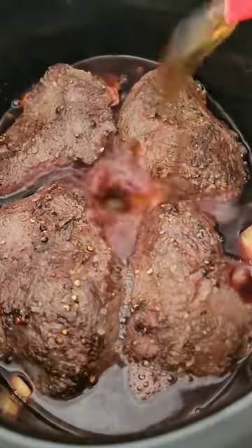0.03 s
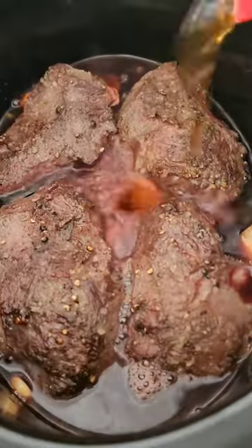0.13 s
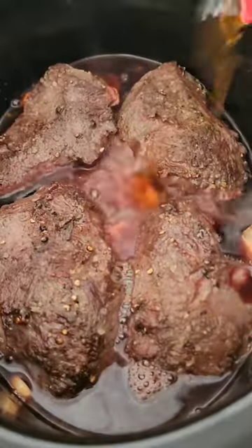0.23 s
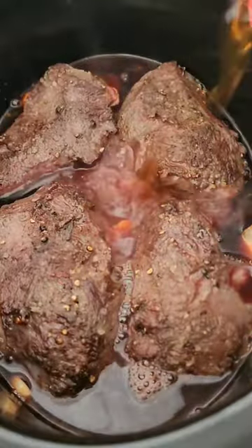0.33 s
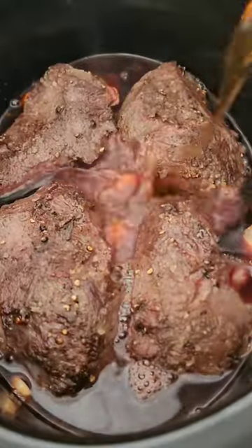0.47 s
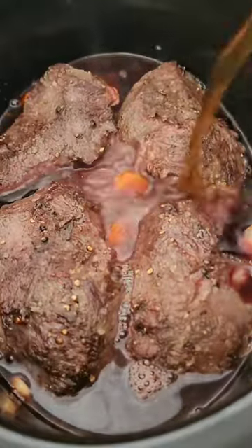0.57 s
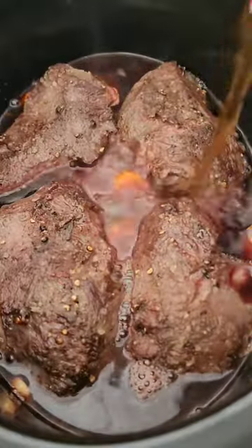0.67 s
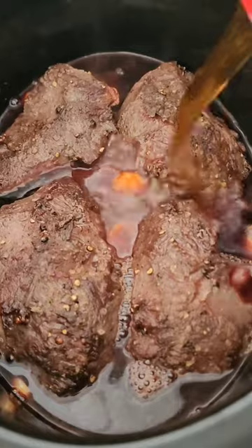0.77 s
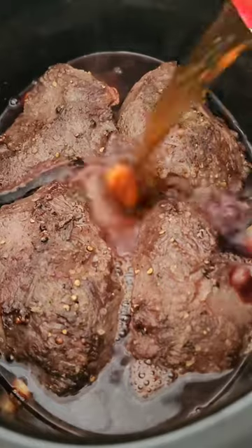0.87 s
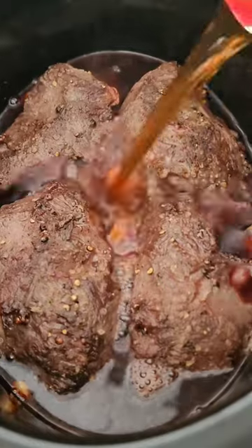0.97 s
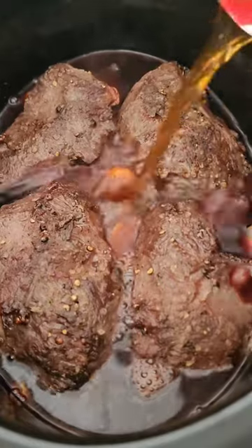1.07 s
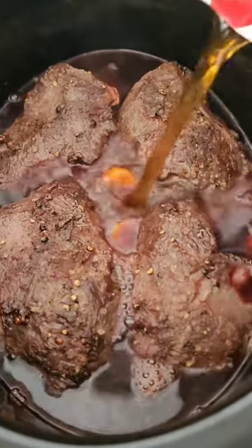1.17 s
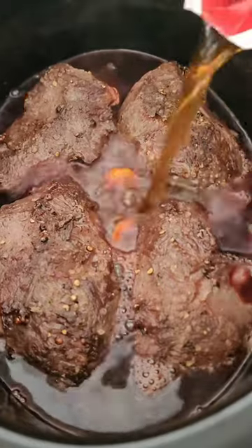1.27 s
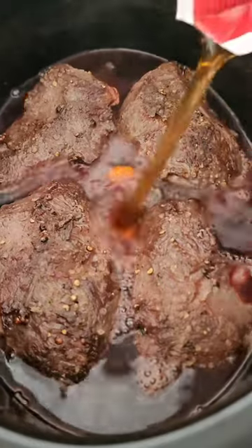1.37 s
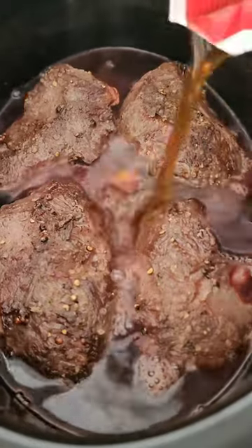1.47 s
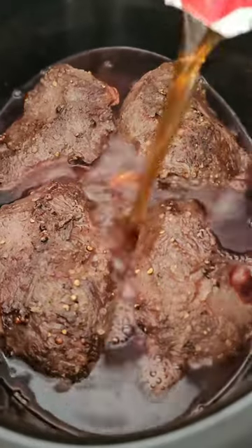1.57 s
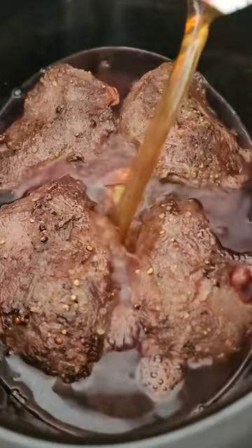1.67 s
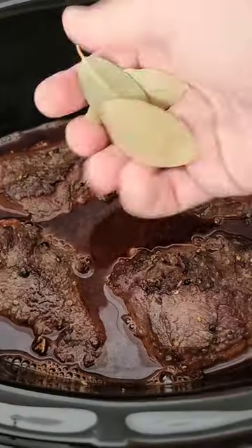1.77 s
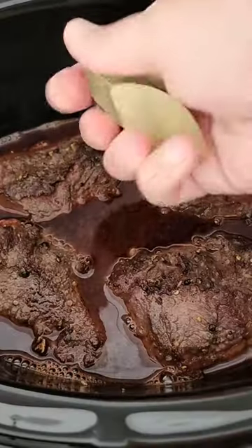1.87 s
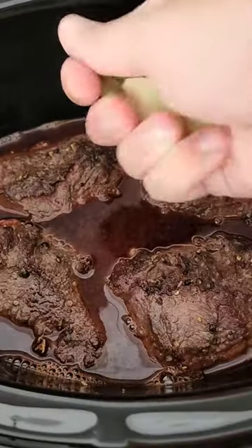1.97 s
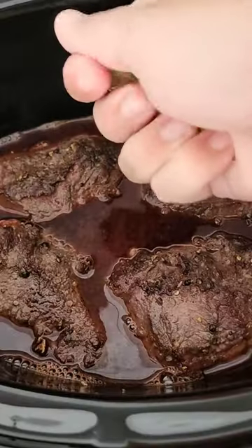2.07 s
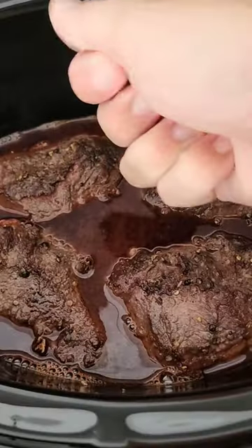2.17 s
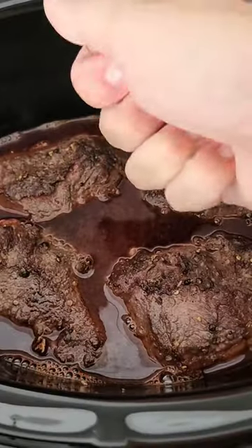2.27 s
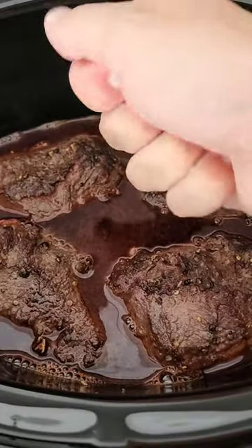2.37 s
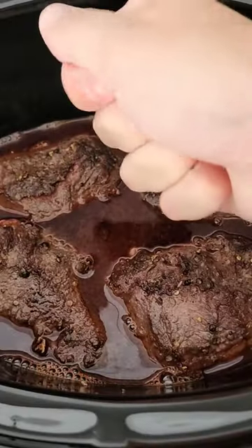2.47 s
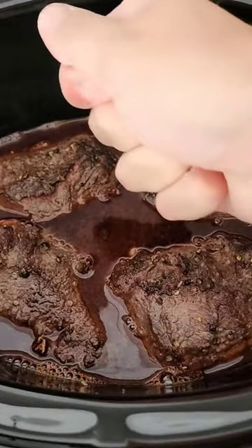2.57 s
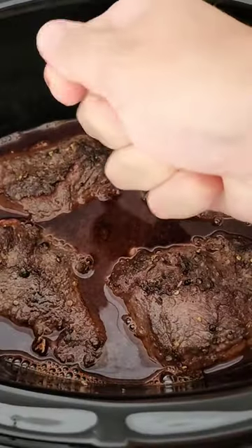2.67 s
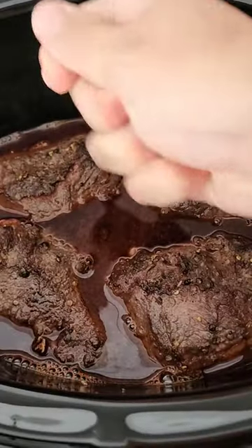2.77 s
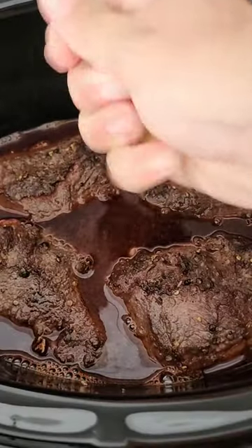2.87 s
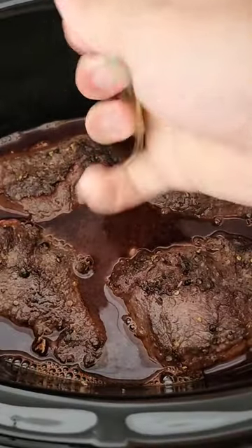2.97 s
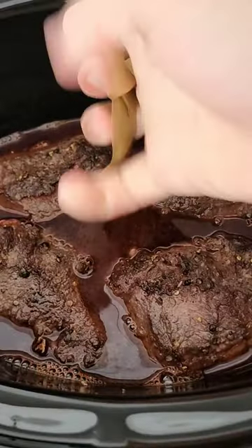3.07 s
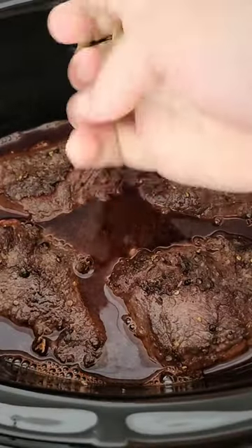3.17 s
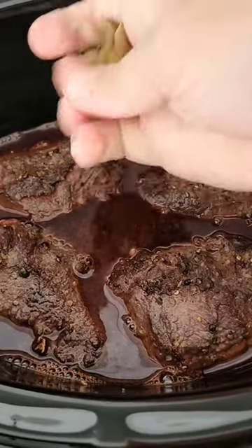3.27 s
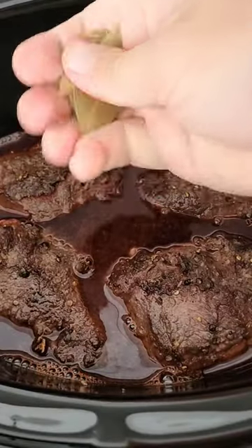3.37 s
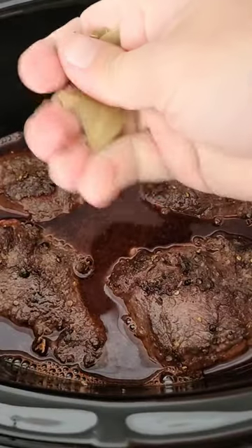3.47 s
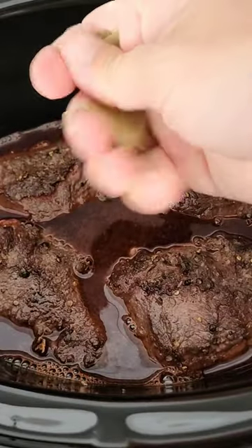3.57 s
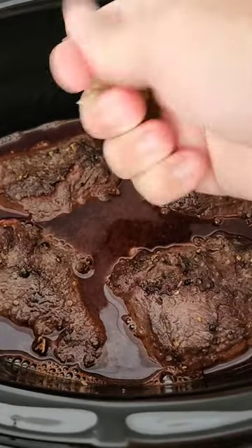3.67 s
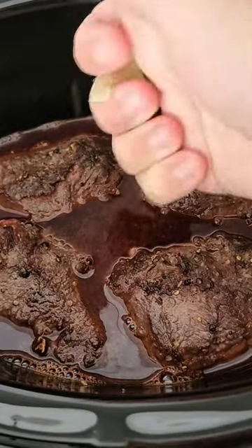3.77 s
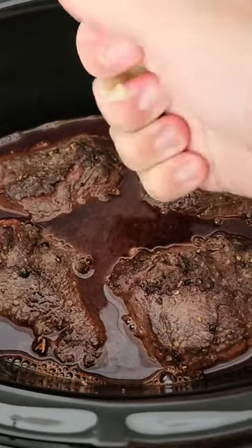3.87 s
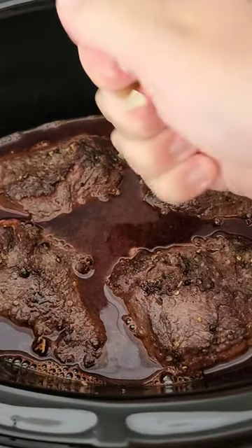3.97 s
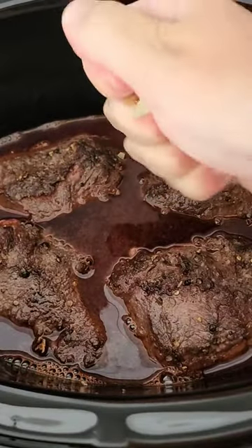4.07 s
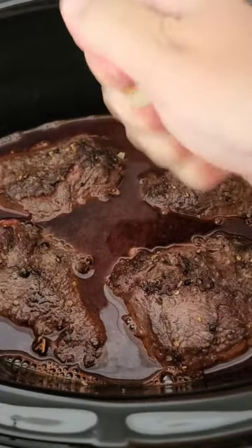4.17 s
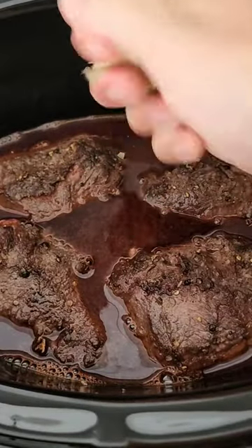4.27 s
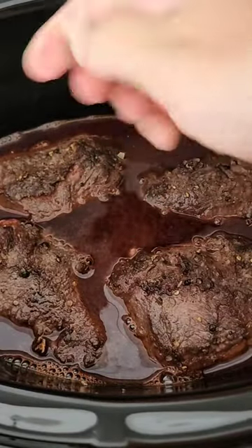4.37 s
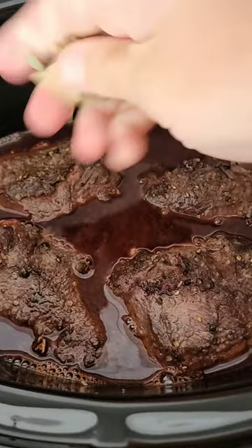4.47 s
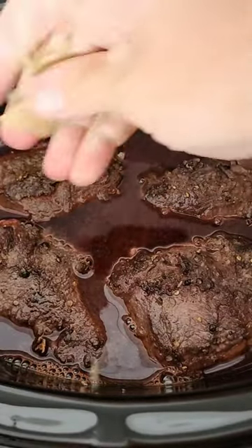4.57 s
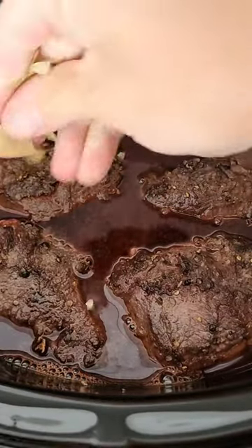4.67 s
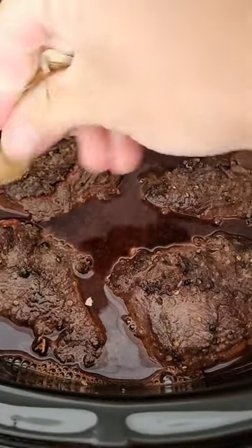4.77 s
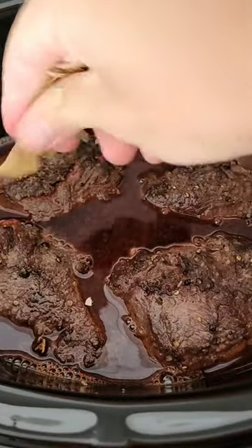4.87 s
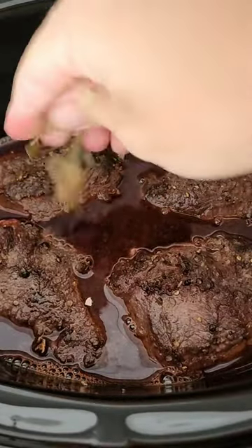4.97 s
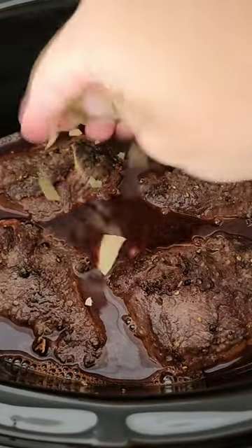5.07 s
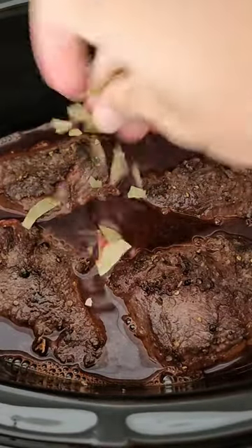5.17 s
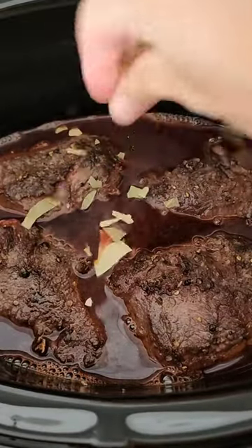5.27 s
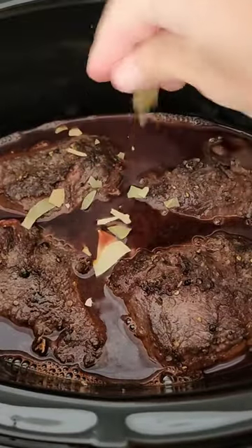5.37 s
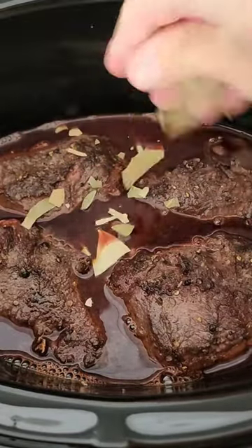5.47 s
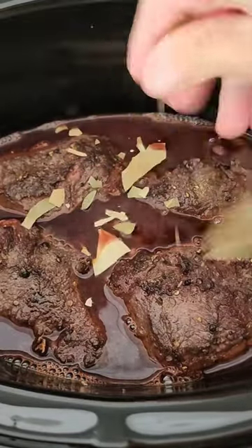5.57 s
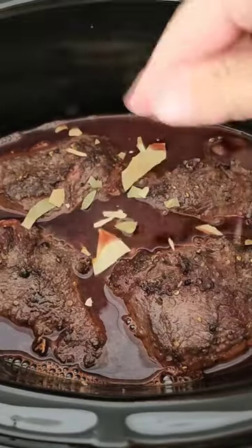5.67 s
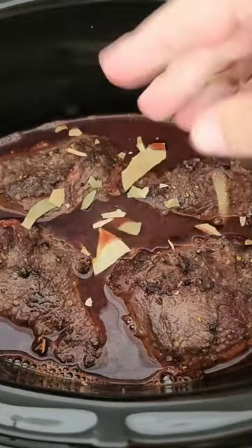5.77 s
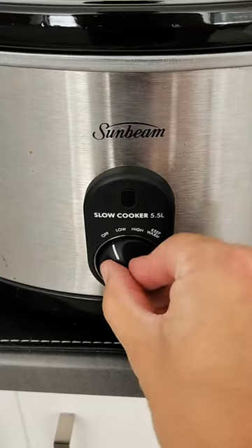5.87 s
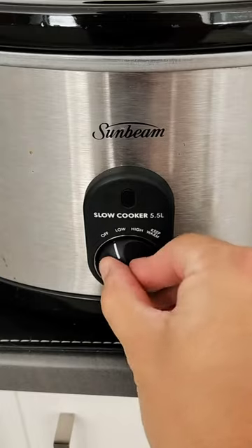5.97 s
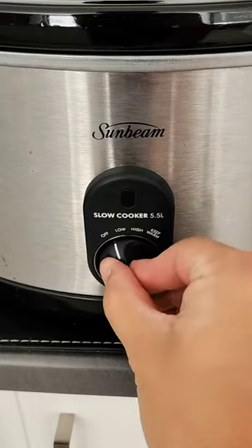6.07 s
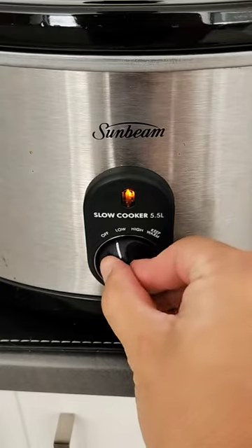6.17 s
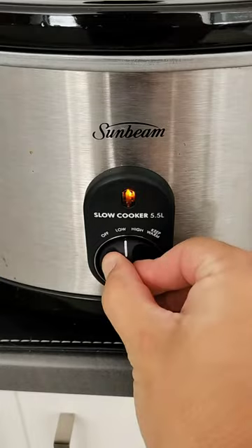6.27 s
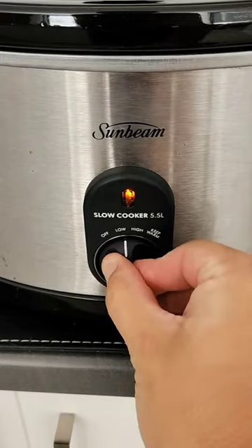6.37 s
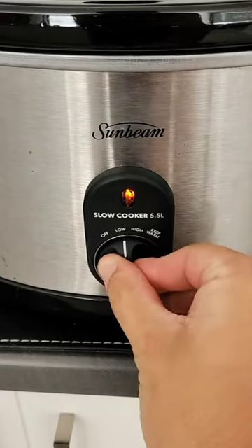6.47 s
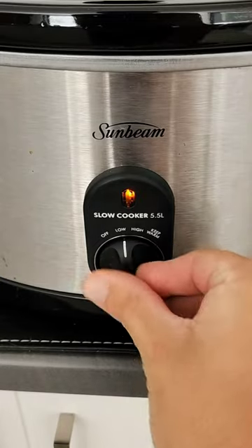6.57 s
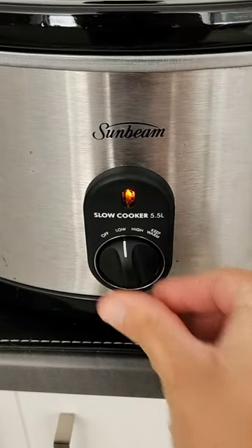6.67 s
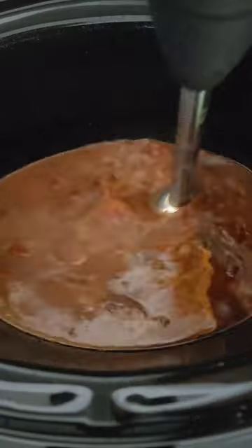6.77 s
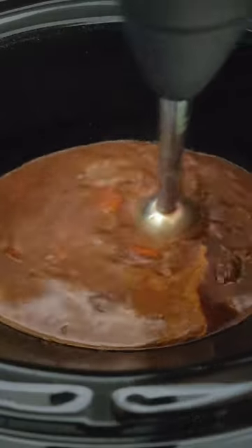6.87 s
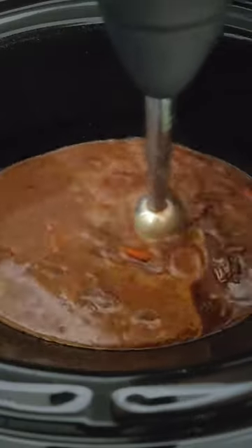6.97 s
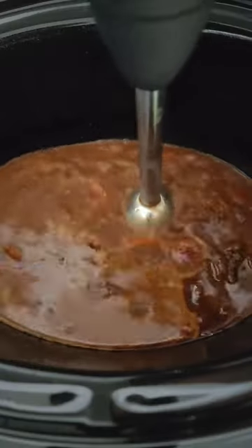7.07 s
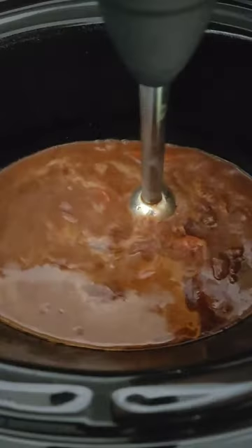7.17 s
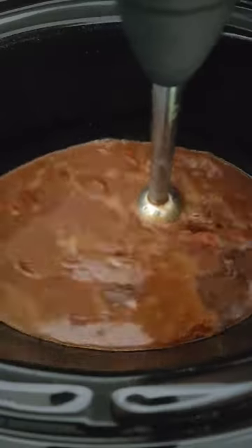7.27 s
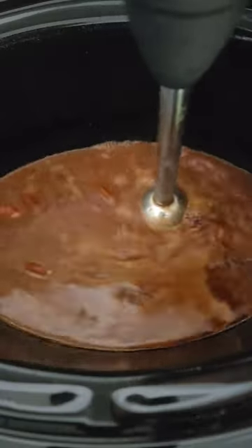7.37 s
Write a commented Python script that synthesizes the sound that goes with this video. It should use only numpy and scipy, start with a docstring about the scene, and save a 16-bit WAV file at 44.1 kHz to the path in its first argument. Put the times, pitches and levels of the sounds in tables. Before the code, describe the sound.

Liquid gulps and patters over meat in a deep pot, with bright chirping bubbles and a slight hollow ring. Brittle leaves then crack violently right by the microphone, clipping and thumping, pause, crunch again and dwindle to rustles. After near silence a dial gives a small double click, and an electric hand blender cuts in, droning and hissing through wet sauce until the end. Close phone pickup, small indoor room.

```python
"""Small kitchen, close to a phone: cooking in a slow cooker.
Stock glugs from a carton onto meat (noise splats, chirped bubbles), dry leaves are crushed over the pot
(noise cracks, grains in fluctuating bands), the dial rubs and clicks (grains, noise hits),
and a stick blender churns sauce (shaft harmonics, grains, comb-filtered hiss).
The crock colours stock and leaves; the room adds a tail to those and the dial. Faint rumble and hum."""
import sys
import numpy as np
from scipy import signal
from scipy.fft import rfft, irfft, next_fast_len
from scipy.io import wavfile
from scipy.ndimage import uniform_filter1d

SR = 44100
rng = np.random.default_rng(int(sys.argv[2]) if len(sys.argv) > 2 else 0)


def transcribe(u):
    """Save the signal u as a 16-bit wav file named by the first command-line argument.

    u: samples, shape (n,) or (channels, n), limited to [-1, 1]; the rate is SR.
    q: integer samples, one column per channel.
    """
    v = np.clip(np.atleast_2d(u).T, -1, 1)
    q = np.round(v * 32767).astype(np.int16)
    wavfile.write(sys.argv[1], SR, q)


N = 326781

# leaf snaps: t/s, level/dB, tilt/(dB/octave)
LEAF_SNAPS = [(2.0855, -20.5, -9.5), (2.1067, -14, -10.5), (2.1264, -11.5, -10.5), (2.1512, -9.5, -5),
              (2.1656, -5, 2.5), (2.2083, -8, 3.5), (2.2514, -5, 2), (2.27, -6.5, -0.5), (2.2775, -5.5, 2),
              (2.3843, -9.5, 1.5), (2.392, -13.5, -3), (2.4124, -12, 1.5), (2.4575, -9, 5),
              (2.4876, -12.5, -0.8), (2.51, -11, -1.5), (2.553, -14.5, -3.5), (2.5657, -11.5, 5),
              (2.5701, -8, 0.5), (2.5835, -15, 1), (2.6799, -15, 7.5), (2.71, -14.5, 16),
              (2.7377, -19.5, 4), (2.7575, -15.5, 2), (2.7701, -12, 3), (2.9375, -31.5, 3), (3.025, -20, 5),
              (3.0957, -26, 4), (3.2723, -37, 9), (3.402, -32.5, 7), (3.4865, -8.5, 5.5), (3.5009, -16, 3),
              (3.6374, -17, 0.4), (3.7889, -16.5, -1.7), (3.8367, -5, -1), (3.9149, -5.5, 1),
              (3.9227, -8.5, -1), (3.9662, -9.5, -1), (3.9754, -10.5, 2.5), (4.0021, -9.5, -0.7),
              (4.009, -11, 0.5), (4.0781, -11.5, -1), (4.099, -26, -4), (4.1735, -21, 0), (4.1859, -10, -1),
              (4.2324, -17, 1.2), (4.5763, -22, 6.5), (4.633, -20.5, -2.5), (4.6734, -29, 2),
              (4.7727, -28.5, 2), (4.9288, -28.5, 2.5), (5.0415, -14, 8), (5.0855, -21, -2),
              (5.1772, -34.5, -6.5), (5.2182, -33, 10), (5.2885, -39, 0), (5.7815, -44.5, 6)]
# low microphone thumps at some snaps: t/s, level/dB
SNAP_THUMPS = [(2.164, -35), (2.252, -36), (2.268, -35), (2.413, -14.5), (2.457, -14.5), (2.518, -14),
               (2.575, -31), (2.710, -21), (3.488, -22.5), (3.837, -36), (4.002, -23.5), (4.185, -16.5)]
# squeezes of the fist: start/s, length/s, crunch level/dB, fine crackle level/dB
FIST_SQUEEZES = [(1.961, 0.025, -50.5, -54), (2.044, 0.025, -38.5, -50), (2.11, 0.069, -20.5, -34),
                 (2.24, 0.081, -25.5, -30), (2.38, 0.051, -27.5, -19.5), (2.513, 0.094, -34, -21),
                 (2.758, 0.034, -31.5, -31), (2.852, 0.19, -45.5, -42), (3.019, 0.07, -42.5, -30.5),
                 (3.232, 0.21, -63, -43.5), (3.422, 0.025, -41, -41), (3.478, 0.048, -27, -21),
                 (3.56, 0.23, -42.5, -37.5), (3.745, 0.037, -30.5, -41), (3.91, 0.14, -27, -25.5),
                 (4.094, 0.13, -32, -38), (4.371, 0.24, -39, -34), (4.608, 0.046, -37, -28.5),
                 (4.683, 0.12, -46.5, -35.5), (4.832, 0.084, -49, -38.5), (5.012, 0.062, -37.5, -31.5),
                 (5.14, 0.081, -58, -39), (5.263, 0.089, -57.5, -39), (5.431, 0.095, -86, -49),
                 (5.579, 0.0093, -70, -43), (5.74, .05, -73.5, -56.5)]
# rasps in the hollow of the hand, and rings of flakes landing in the pot: t/s, centre f/Hz, level/dB, decay/s
RASPS_AND_LANDINGS = [(2.384, 2930, -15, 0.018), (2.552, 1830, -14.5, 0.012), (2.583, 1880, -18, .012),
                      (2.641, 1900, -27, .008), (2.657, 1920, -27, .008), (2.68, 1860, -24, 0.0075),
                      (2.565, 913, -33, 0.038), (3.918, 960, -22, 0.014), (4.449, 1270, -48, 0.038),
                      (4.632, 960, -34, 0.01), (4.921, 1160, -45.5, 0.02), (5.038, 1050, -47.5, 0.045),
                      (5.596, 3720, -57, 0.013), (5.781, 4400, -47, 0.013)]
# leaf spectrum: f/Hz, relative level/dB
LEAF_SPECTRUM = [(180, -50.5), (300, -37.5), (744, -28), (877, -16.5), (1620, -17.5), (1840, -6.5),
                 (2100, -7.5), (3180, 3.5), (3690, -1.5), (4720, 2), (8280, -2), (13100, -3), (15500, -3.5)]
# splats on meat and liquid: t/s, reference level/dB, tilt/(dB/octave)
STOCK_SPLATS = [(0.021, -25.5, 0.5), (0.0694, -24, -1.5), (0.0817, -24, 2), (.039, -27, 3),
                (0.129, -28, 0.5), (0.197, -22.5, -0.5), (0.2942, -22.5, 2), (0.3598, -23.5, 4),
                (0.446, -21, 1.5), (0.4828, -19, 5.5), (0.5424, -20.5, 3.5), (0.5625, -25, 3),
                (0.5945, -24.5, -1), (0.657, -22.5, -2.5), (0.6846, -30, -2), (0.726, -27.5, 2),
                (0.766, -30.5, -1), (0.822, -31.5, -3.5), (0.956, -28.5, 3), (1.0341, -18.5, 3),
                (1.0506, -15.5, 3.5), (1.0868, -27.5, -3), (1.2225, -22, 1), (1.265, -31, -10.5),
                (1.356, -28, -3.5), (1.4568, -27, 9.5), (1.519, -24, 0), (1.605, -26.5, 8),
                (1.6443, -26.5, 0.5), (1.802, -23.5, 1)]
# single air bubbles: t/s, starting f/Hz, level/dB
AIR_BUBBLES = [(0.019, 1197, -24.5), (.129, 3400, -17.5), (.188, 4430, -16.5), (0.359, 3530, -14.5),
               (.447, 2230, -13.5), (0.402, 4680, -15), (0.494, 1210, -21), (0.533, 2820, -13.5),
               (0.686, 3425, -6.5), (0.753, 4600, -18.5), (0.905, 3810, -14.5), (0.959, 3240, -10),
               (1.042, 595, -21), (1.264, 567, -22.5), (1.314, 583, -27.5), (1.357, 4760, -14),
               (1.366, 575, -20.5), (1.587, 2040, -20.5), (1.698, 498, -26.5)]
# steady stream under the splats: t/s, level/dB
STEADY_STREAM = [(0, -38), (.42, -49.5), (.72, -44.5), (.9, -42.5), (1.1, -43), (1.32, -38), (1.43, -49),
                 (1.56, -37.5), (1.75, -46.5)]
# stock spectrum: f/Hz, relative level/dB
POUR_SPECTRUM = [(200, -37.5), (440, -20), (620, -1.5), (850, -23), (1150, 0), (1600, -18), (2000, -9),
                 (3400, -9), (4600, -8), (9400, -11), (15500, -21.5)]
# air resonances of the crock: f/Hz, width/Hz, relative level/dB
CROCK_MODES = [(580, 76, -4), (913, 23, -5), (1180, 21, 3), (1900, 59, 6.5), (2400, 69, -11),
               (3370, 63, -17), (4373, 70, -5.5)]
# blender course: t/s, shaft f/Hz, hum level/dB, churn level/dB, gear hiss level/dB
BLENDER_COURSE = [(6.85, 245.5, -20, -21.5, -23), (7.04, 244.7, -18, -20.5, -25),
                  (7.16, 243, -14, -16.5, -26.5), (7.23, 245.6, -15.5, -19, -23.5),
                  (7.41, 247.6, -15, -16.5, -25)]
# motor harmonics: multiple of shaft f, relative level/dB
MOTOR_HARMONICS = [(1, -3.5), (2, -0.5), (3, -3.5), (4, -9.5), (5, -9), (6, -12), (7, -15.5), (8, -15.5),
                   (9, -15), (10, -14), (11, -31), (12, -16), (13, -16), (14, -23), (15, -20)]
# wavering side tones of the drive: multiple of shaft f, relative level/dB
DRIVE_WHINE = [(.47, -14.5), (1.41, -14), (2.145, -3.5), (12.59, -13.5), (14.63, -12)]
# sauce spectrum: f/Hz, relative level/dB
CHURN_SPECTRUM = [(50, -17), (85, 2), (115, -2.5), (160, -4.5), (195, -23), (320, -4), (530, -1), (650, -4),
                  (1250, 2), (1800, -5.5), (3500, -5), (5500, -10.5), (8000, -19.5), (15000, -24)]
# gear hiss spectrum: f/Hz, relative level/dB
GEAR_SPECTRUM = [(3500, -41), (6000, -8.5), (9000, -6.5), (10100, 5), (11100, -9.5), (12000, -3.5),
                 (13500, -6), (15500, -18)]
# dial clicks: t/s, level/dB, tilt/(dB/octave)
DIAL_CLICKS = [(5.882, -66.5, -20), (6.056, -43.5, -3.5), (6.066, -50.5, -4.5), (6.354, -30.5, 0),
               (6.360, -33, 12.5), (6.372, -36.5, -17)]
# dial turns: start/s, length/s, level/dB
DIAL_TURNS = [(5.925, .065, -54.5), (6.335, .02, -56)]
# click spectrum: f/Hz, relative level/dB
CLICK_SPECTRUM = [(90, -25), (170, -19), (450, -14), (690, -3.5), (900, -20.5), (1670, 3), (2600, -1),
                  (5000, -17), (8100, -25), (13000, -62)]
# knob rub spectrum: f/Hz, relative level/dB
RUB_SPECTRUM = [(300, -36), (600, 0), (1350, -5), (2100, -27), (5000, -44)]
# appliance hum: f/Hz, level/dB
APPLIANCE_HUM = [(113, -86), (307, -89.5), (355, -81.5), (3564, -105.5)]
# room rumble spectrum: f/Hz, relative level/dB
ROOM_SPECTRUM = [(20, -20.5), (60, -2), (100, 1.5), (190, -14.5), (360, -8.5), (480, -15.5), (900, -32),
                 (3500, -47), (15500, -51)]

SQUEEZE_RISE_S, SQUEEZE_FALL_S = 0.016, 0.022
POUR_END_S = 1.817
# relative to the splat reference level
SLAP_DB, CLUSTER_MAX_DB, SPRAY_DB = -7, 7, -17
CLUSTER_RANGE_DB, CLUSTER_S = 15.5, 0.021
SPRAY_RISE_S, SPRAY_FALL_S = 0.014, 0.017
BLEND_START_S = 6.849
BUZZ_DB = -13.5  # relative to the hum
TURN_RISE_S, TURN_FALL_S = 0.02, 0.026
ROOM_DB = -77
TOP_HZ = 15550
TIME_S = np.arange(N) / SR
FREQ_HZ = np.maximum(np.fft.rfftfreq(4096, 1 / SR), 1)


def leaves():
    """Brittle leaves snap; flakes grind at each squeeze, rasp in the hollow of the hand, and some land in the
    pot and ring."""
    press_rows = [(s, length_s, db) for s, length_s, db, _ in FIST_SQUEEZES]
    crumble_rows = [(s, length_s, db) for s, length_s, _, db in FIST_SQUEEZES]
    press = strokes(press_rows, SQUEEZE_RISE_S, SQUEEZE_FALL_S)
    crumble = strokes(crumble_rows, SQUEEZE_RISE_S, SQUEEZE_FALL_S)

    flakes = grains(rate_hz=4500, spread_db=2.2) * undb(2.5 * walk(90))
    flakes = crinkle(colour(flakes, LEAF_SPECTRUM), depth_db=3.5, rate_hz=45)
    crunch_band = signal.butter(3, 5200, fs=SR, output="sos")
    crackle_band = signal.butter(5, 6200, "high", fs=SR, output="sos")
    crunch = unit(signal.sosfilt(crunch_band, flakes))
    crackle = unit(signal.sosfilt(crackle_band, flakes))
    grind = press * crunch + crumble * crackle

    snaps = hits(LEAF_SNAPS, LEAF_SPECTRUM, crack_s=0.0012, after_db=-9.5, after_s=0.009, patchy_db=3)
    rasps, t = np.zeros(N), TIME_S[:SR // 4]
    for s, hz, db, decay_s in RASPS_AND_LANDINGS:
        band = signal.butter(2, [0.91 * hz, 1.1 * hz], "band", fs=SR, output="sos")
        noise = unit(signal.sosfilt(band, rng.standard_normal(len(t))))
        add(rasps, s, undb(db) * noise * np.exp(-t / decay_s))
    in_pot = crock(snaps + grind, echo_s=0.0059, echo_db=-11.5, ring_db=-16.5)
    return kitchen(in_pot + rasps, wet_db=-14.0, t60_s=0.45)


def thumps(pulse_s=0.000059):
    """Overloaded microphone thumps at some snaps: one-sided negative pulses, high-passed at 70 Hz."""
    out, t = np.zeros(N), TIME_S[:SR // 50]
    for s, db in SNAP_THUMPS:
        add(out, s, -undb(db) * t / pulse_s * np.exp(1 - t / pulse_s))
    return signal.sosfilt(signal.butter(1, 70, "high", fs=SR, output="sos"), out)


def pour():
    """Stock lands in gulps: splats trap bubble clusters; drops and fizz patter in between."""
    spray_rows = [(s, SPRAY_RISE_S, db + SPRAY_DB) for s, db, _ in STOCK_SPLATS]
    spray = strokes(spray_rows, SPRAY_RISE_S, SPRAY_FALL_S)
    flow = np.hypot(undb(curves(STEADY_STREAM)[0]), spray)

    rings, fizz = np.zeros(N), np.zeros(N)
    for s, hz, db in AIR_BUBBLES:
        add(rings, s, undb(db) * bubble(hz, 30 * (hz / 2000) ** 0.51, glide=0.084))
    for s, db, tilt_db in STOCK_SPLATS:
        for when, pitch, size in rng.random((10, 3)):
            hz = 1900 * 3.6 ** pitch * 2 ** (tilt_db / 16)
            level_db = db + CLUSTER_MAX_DB - CLUSTER_RANGE_DB * size
            add(rings, s + CLUSTER_S * when ** 2, undb(level_db) * bubble(hz, cycles=18, glide=0.15))
    # mostly tiny; a few stand out
    for when, pitch, size in rng.random((1500, 3)):
        level_db = 20 * size ** 3 - 16 * abs(pitch - 0.45)
        ring = bubble(1700 * 6.5 ** pitch, cycles=21, glide=0.08)
        add(fizz, when * POUR_END_S, undb(level_db) * ring)
    fizz /= np.std(fizz[TIME_S < POUR_END_S])

    drops = colour(grains(rate_hz=1800, spread_db=1.5), POUR_SPECTRUM)
    patter = (0.45 * drops + 0.8 * fizz) * undb(3 * walk(70))
    slaps = hits(STOCK_SPLATS, POUR_SPECTRUM, crack_s=0.0049, after_db=-3, after_s=0.012, patchy_db=8.5)
    in_pot = crock(undb(SLAP_DB) * slaps + rings + flow * patter, echo_s=0.0028, echo_db=-5.0, ring_db=-20)
    end_fade = np.clip((POUR_END_S - TIME_S) / 0.002, 0, 1)
    return kitchen(in_pot, wet_db=-12, t60_s=0.28) * end_fade


def bubble(hz, cycles, glide):
    """A trapped bubble rings down and rises in pitch as it nears the surface."""
    age = np.arange(int(cycles * SR / hz)) * hz / SR / cycles  # 0..1
    tone = np.sin(2 * np.pi * cycles * (age + glide * age ** 2 / 2))
    return tone * np.exp(-np.log(100) * age) * (1 - np.exp(-age / 0.071))


def blender():
    """Motor hums at shaft multiples with drifting levels; churn and hiss swell once a turn."""
    hz, hum_db, churn_db, gear_db = curves(BLENDER_COURSE)
    turn_rad = 2 * np.pi * np.cumsum(hz * (1 + 0.002 * walk(70))) / SR
    hum = sum(undb(db + 2.2 * walk(70)) * np.sin(k * turn_rad + rng.uniform(0, 2 * np.pi))
              for k, db in MOTOR_HARMONICS)
    whine = sum(undb(db + 2.5 * walk(40)) * np.sin(k * turn_rad + 0.7 * walk(50))
                for k, db in DRIVE_WHINE)
    motor = unit(hum + whine) + undb(BUZZ_DB) * buzz(turn_rad, fall_db=7.5)

    lumps = grains(rate_hz=5000, spread_db=2.5) * (1 + 0.4 * np.sin(turn_rad))
    churn = unit(crinkle(colour(lumps, CHURN_SPECTRUM), depth_db=2.2, rate_hz=25))
    churn = churn * undb(1.2 * walk(60))

    # half-gain repeat one turn later combs the hiss
    rattle = rng.standard_normal(N) * (1 + 0.17 * np.sin(turn_rad))
    rattle = rattle + 0.5 * np.interp(TIME_S - 1 / hz, TIME_S, rattle)
    gear = unit(colour(rattle, GEAR_SPECTRUM)) * undb(2.1 * walk(90))

    sound = undb(hum_db) * motor + undb(churn_db) * churn + undb(gear_db) * gear
    return sound * np.clip((TIME_S - BLEND_START_S) / 0.0029, 0, 1)


def buzz(turn_rad, fall_db, count=56):
    """One rough pattern repeats every turn: overtones above the hum, falling per octave."""
    k = np.arange(len(MOTOR_HARMONICS) + 1, count)
    angle_rad = np.linspace(0, 2 * np.pi, 2048)
    size = undb(-fall_db * np.log2(k)) * rng.rayleigh(size=len(k))
    pattern = np.sin(np.outer(angle_rad, k) + rng.uniform(0, 2 * np.pi, len(k))) @ size
    return unit(np.interp(turn_rad % (2 * np.pi), angle_rad, pattern))


def dial():
    """The plastic knob rubs (grains); a finger taps it and it drops into its detents (noise hits)."""
    rub = colour(grains(rate_hz=1500, spread_db=3), RUB_SPECTRUM)
    rub = rub * strokes(DIAL_TURNS, TURN_RISE_S, TURN_FALL_S)
    clicks = hits(DIAL_CLICKS, CLICK_SPECTRUM, crack_s=0.0052, after_db=-7.0, after_s=0.018, patchy_db=4.5)
    return kitchen(rub + clicks, wet_db=-9.5, t60_s=0.19)


def background():
    """Rumble is filtered noise; appliance hum is sines with slowly drifting levels."""
    hum = sum(undb(db + 1.1 * walk(3.3)) * np.sqrt(2) * np.sin(2 * np.pi * hz * TIME_S)
              for hz, db in APPLIANCE_HUM)
    return hum + undb(ROOM_DB) * colour(rng.standard_normal(N), ROOM_SPECTRUM)


def crock(x, echo_s, echo_db, ring_db):
    """The pot returns a smeared echo and rings at its air resonances."""
    t = TIME_S[:SR // 10]
    ring = np.zeros(len(t))
    for hz, width_hz, db in CROCK_MODES:
        gain = undb(db + ring_db) * 2 * np.pi * width_hz / SR
        ring += gain * np.exp(-np.pi * width_hz * t) * np.cos(2 * np.pi * hz * t)
    echo = (t > echo_s) * np.exp(-abs(t - echo_s) / 0.0027) * rng.standard_normal(len(t))
    return x + signal.fftconvolve(x, ring)[:N] + undb(echo_db) * convolve(x, echo)


def kitchen(x, wet_db, t60_s):
    """Direct sound plus a noise tail; its weaker full-band part decays slightly slower."""
    t = TIME_S[:SR // 2]
    noise = rng.standard_normal(len(t))
    low = signal.sosfilt(signal.butter(2, 8000, fs=SR, output="sos"), noise)
    fade = np.exp(-np.log(1000) * t / t60_s)
    tail = low * fade + 0.5 * rng.standard_normal(len(t)) * fade ** 0.93
    return x + undb(wet_db) * convolve(x, tail * (1 - np.exp(-t / 0.0027)))


def hits(rows, points, crack_s, after_db, after_s, patchy_db):
    """Each hit is a sharp crack plus a weaker scatter, with its own random spectrum."""
    out, t = np.zeros(N), TIME_S[:SR // 10]
    decay = np.exp(-t / crack_s) + undb(min(after_db, 0)) * np.exp(-t / after_s)
    shape = decay * (1 - np.exp(-t / 0.00008))
    hz = np.geomspace(80, 16000, 36)
    points_hz, points_db = np.transpose(points)
    db = np.interp(np.log(hz), np.log(points_hz), points_db)
    for s, level_db, tilt_db in rows:
        own_db = db + patchy_db * np.minimum(hz / 2000, 1) * rng.standard_normal(len(hz))
        burst = colour(shape * rng.standard_normal(len(t)), np.c_[hz, own_db], tilt_db)
        add(out, s, undb(level_db) * burst / np.std(burst[:SR // 200]))  # level over first 5 ms
    return out


def strokes(rows, rise_s, fall_s):
    """Gain strokes: linear rise from the start, exponential fall after the length."""
    out = np.zeros(N)
    for s, length_s, db in rows:
        t = TIME_S[:int((length_s + 10 * fall_s) * SR)]
        fall = np.exp(-np.maximum(t - length_s, 0) / fall_s)
        add(out, s, undb(db) * np.minimum(t / rise_s, 1) * fall)
    return out


def crinkle(x, depth_db, rate_hz, count=16):
    """Overlapping narrow bands swell and fade independently."""
    size = next_fast_len(N, True)
    log_hz = np.log1p(np.fft.rfftfreq(size, 1 / SR))
    place = np.interp(log_hz, np.log([800, 15000]), [0, count - 1])
    spectrum = rfft(x, size)
    out = np.zeros(N)
    for k in range(count):
        band = irfft(spectrum * np.maximum(1 - abs(place - k), 0), size)[:N]
        out += band * undb(depth_db * walk(rate_hz))
    return out


def grains(rate_hz, spread_db):
    """Random tiny clicks, a few much larger than the rest, at rms 1."""
    size = undb(spread_db * np.minimum(rng.exponential(size=N), 4))
    return unit((rng.random(N) < rate_hz / SR) * size * rng.standard_normal(N))


def walk(rate_hz):
    """Smooth random drift at rms 1."""
    k = int(SR / rate_hz)
    steps = np.repeat(rng.standard_normal(N // k + 1), k)
    return unit(uniform_filter1d(uniform_filter1d(steps, k), k)[:N])


def colour(x, points, tilt_db=0):
    """Minimum-phase filter through (f/Hz, level/dB) points, tilted per octave over 1-12 kHz."""
    hz, db = np.transpose(points)
    db = np.interp(np.log(FREQ_HZ), np.log(hz), db) + tilt_db * np.log2(np.clip(FREQ_HZ, 1000, 12000))
    cepstrum = irfft(np.log(undb(db)))
    half = len(cepstrum) // 2
    folded = np.r_[cepstrum[0], 2 * cepstrum[1:half]]  # causal part only
    return convolve(x, irfft(np.exp(rfft(folded, 2 * half)))[:half])


def convolve(x, response):
    """Convolve with a response scaled to unit energy."""
    return signal.fftconvolve(x, response / np.linalg.norm(response))[:len(x)]


def curves(rows):
    """Interpolate each table column over time."""
    s, *columns = np.transpose(rows)
    return [np.interp(TIME_S, s, c) for c in columns]


def add(out, s, x):
    """Mix x into out from time s."""
    i = max(int(s * SR), 0)
    out[i:i + len(x)] += x[:N - i]


def undb(db):
    """Decibels to gain."""
    return 10 ** (np.asarray(db) / 20)


def unit(x):
    """Scale to rms 1."""
    return x / np.sqrt(np.mean(x ** 2))


def scene():
    """Sum all sources at one microphone."""
    return (leaves() + thumps() + pour() + blender() + dial() + background())[None]


def record(dry):
    """The phone clips peaks beyond 0.98 and cuts the top."""
    low_pass = signal.ellip(10, 0.2, 75, TOP_HZ, fs=SR, output="sos")
    return signal.sosfilt(low_pass, np.clip(dry, -0.98, 0.98))


dry = scene()
out = record(dry)
transcribe(out)
```